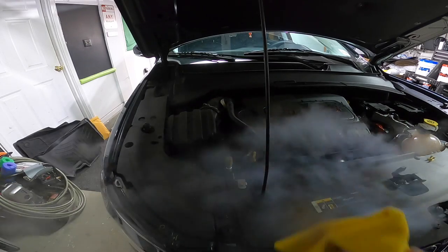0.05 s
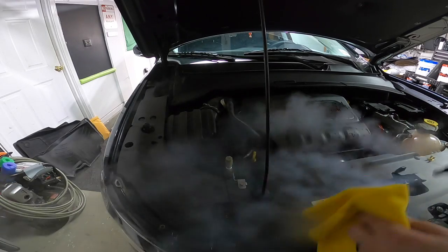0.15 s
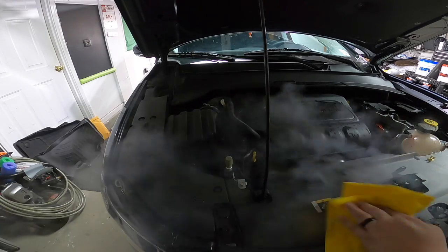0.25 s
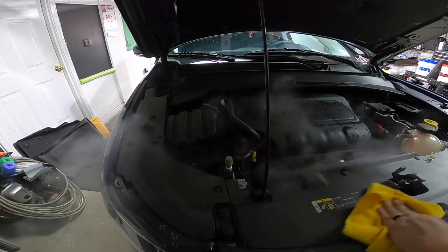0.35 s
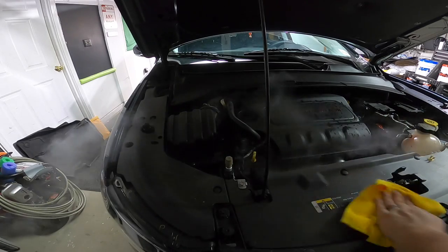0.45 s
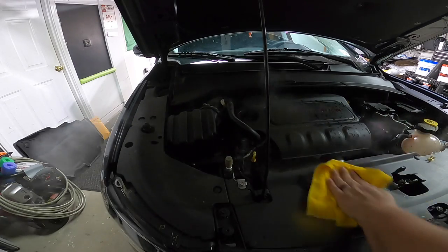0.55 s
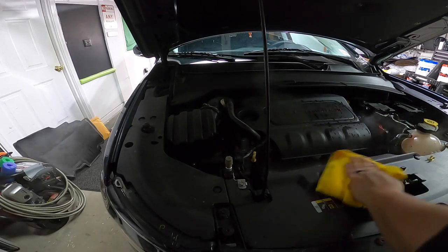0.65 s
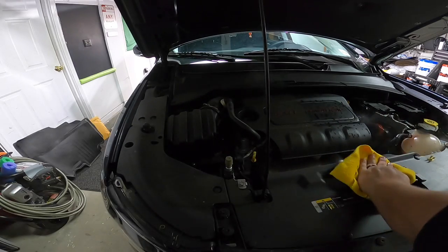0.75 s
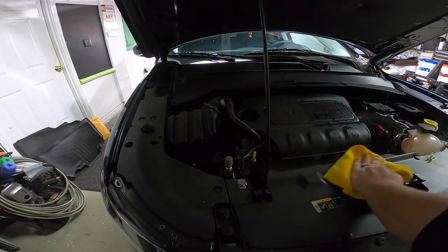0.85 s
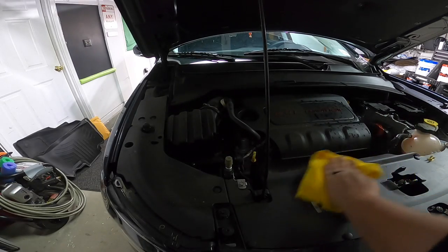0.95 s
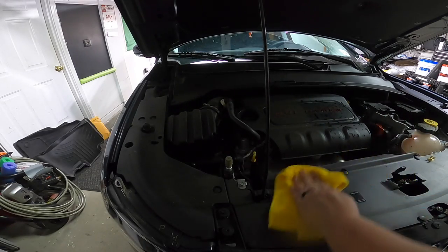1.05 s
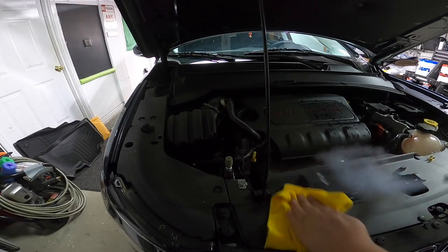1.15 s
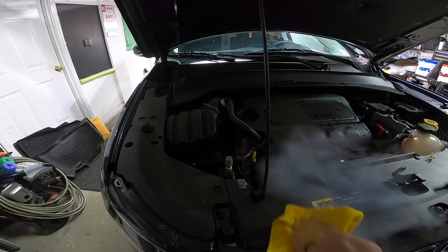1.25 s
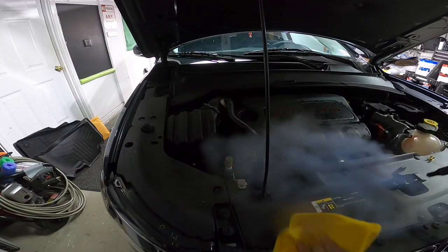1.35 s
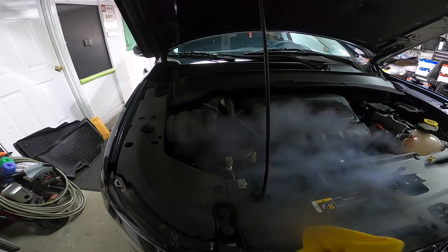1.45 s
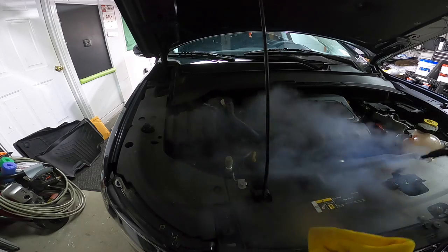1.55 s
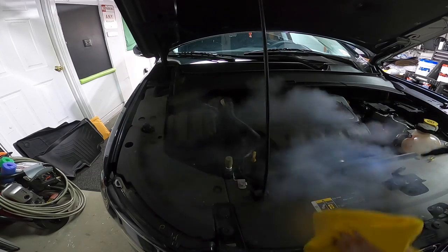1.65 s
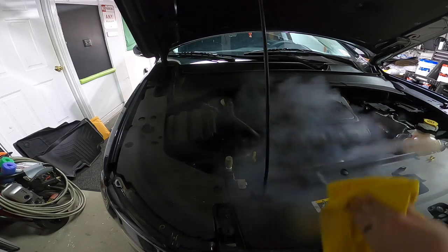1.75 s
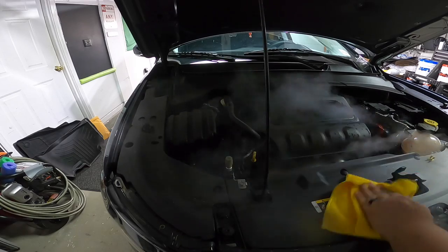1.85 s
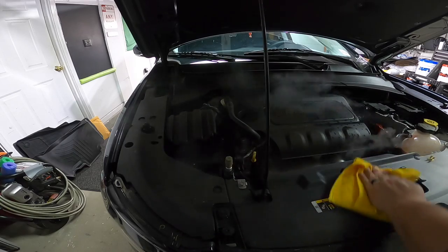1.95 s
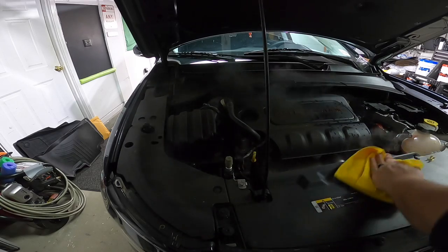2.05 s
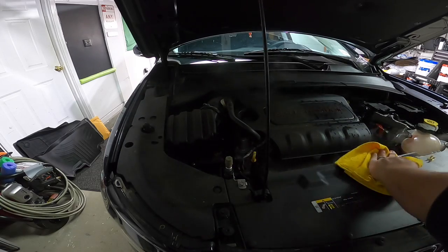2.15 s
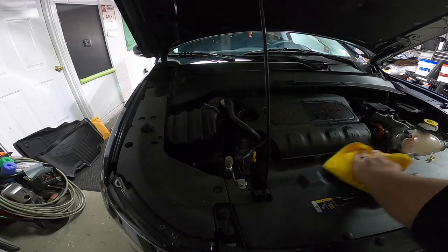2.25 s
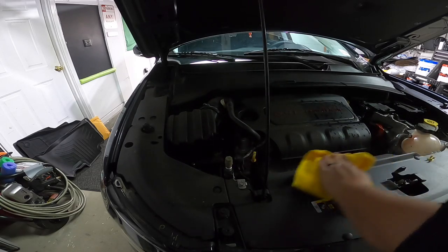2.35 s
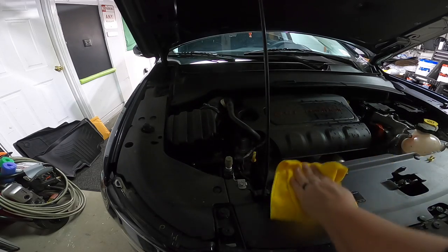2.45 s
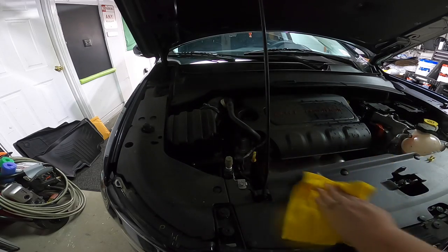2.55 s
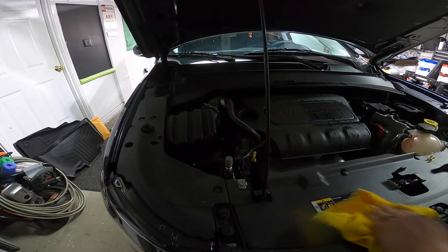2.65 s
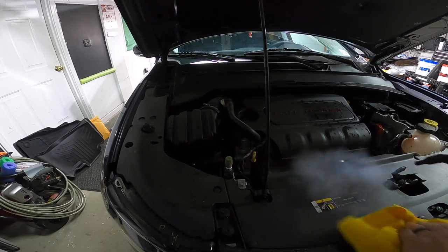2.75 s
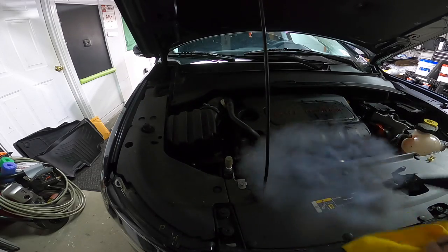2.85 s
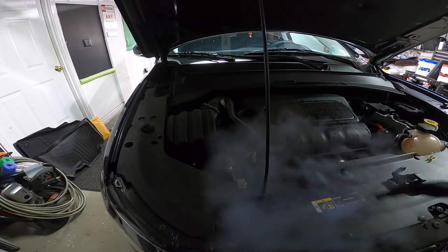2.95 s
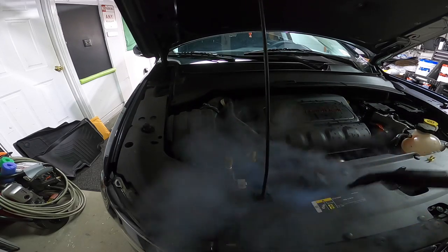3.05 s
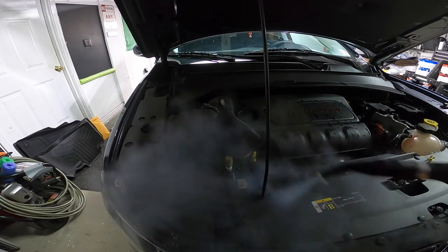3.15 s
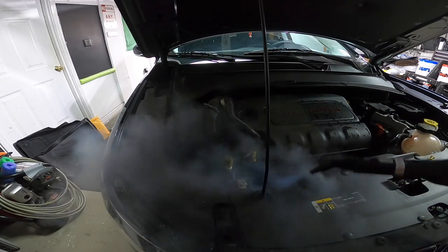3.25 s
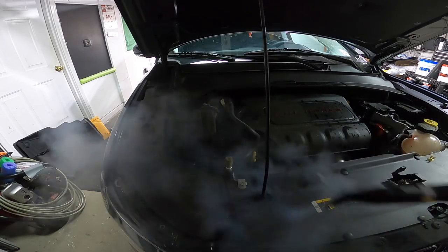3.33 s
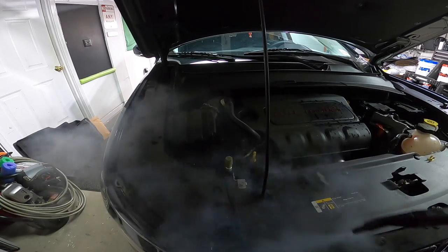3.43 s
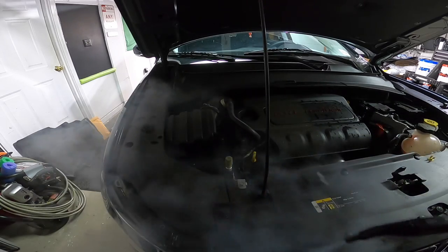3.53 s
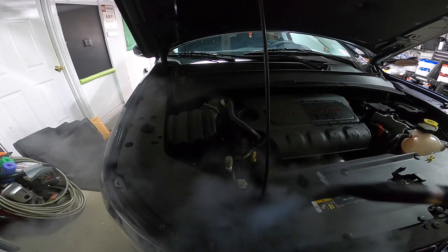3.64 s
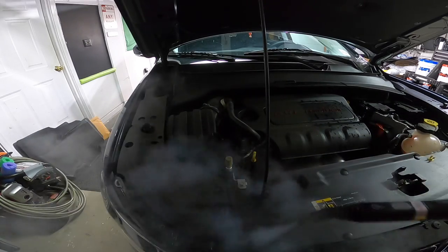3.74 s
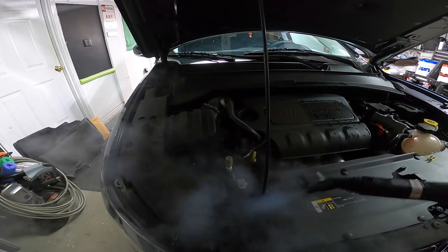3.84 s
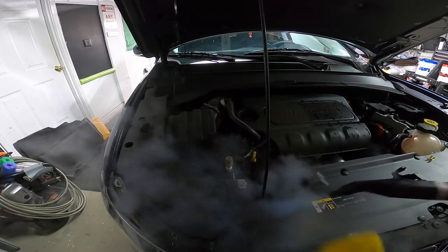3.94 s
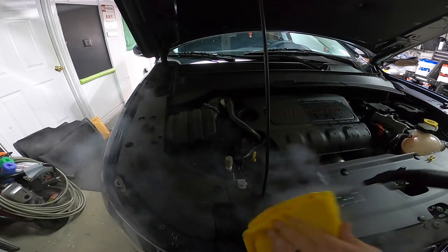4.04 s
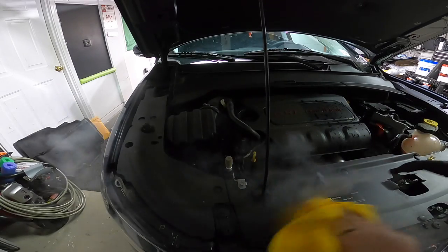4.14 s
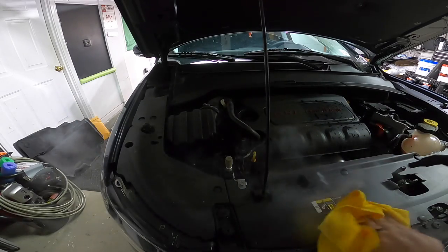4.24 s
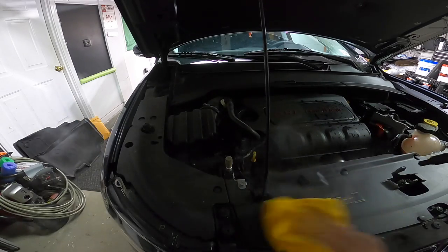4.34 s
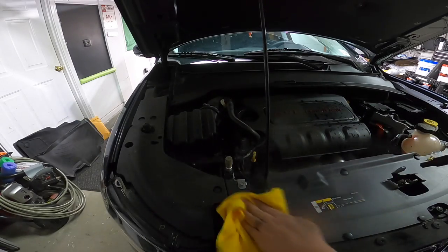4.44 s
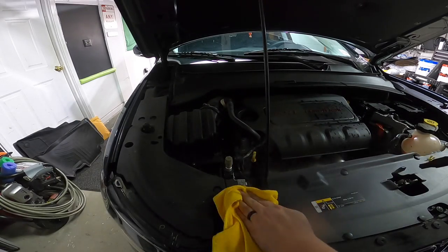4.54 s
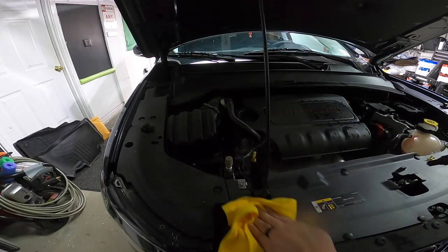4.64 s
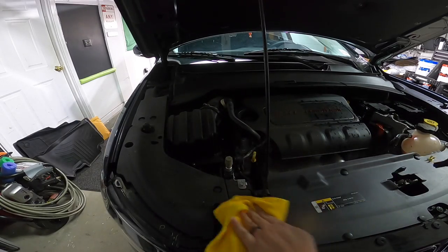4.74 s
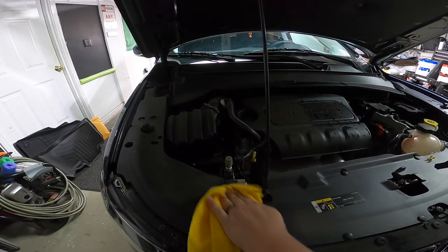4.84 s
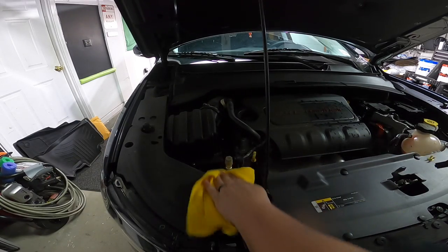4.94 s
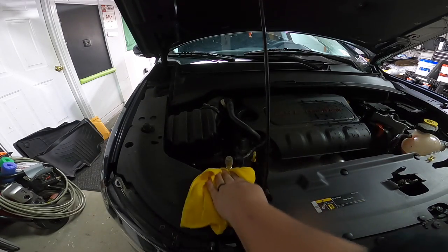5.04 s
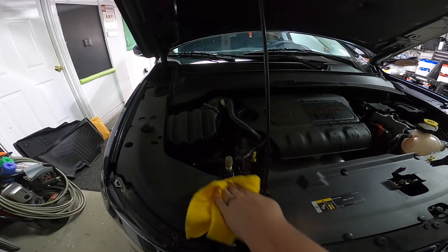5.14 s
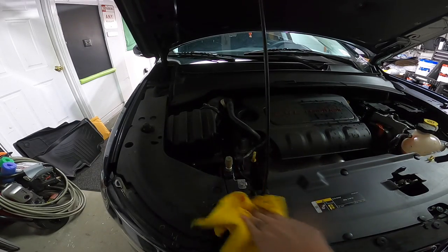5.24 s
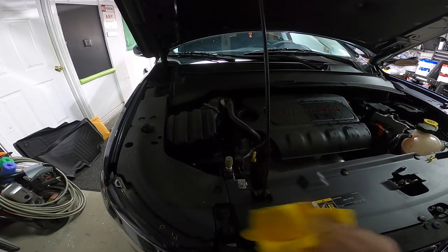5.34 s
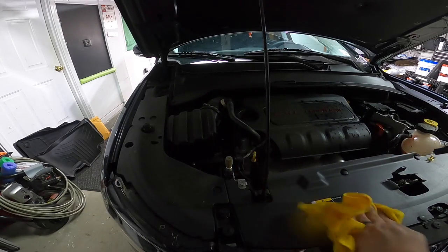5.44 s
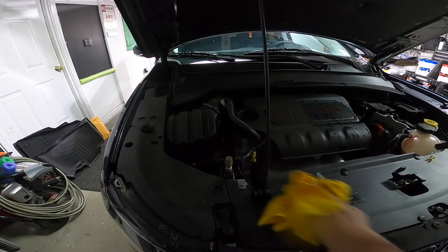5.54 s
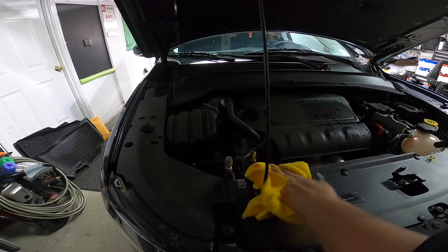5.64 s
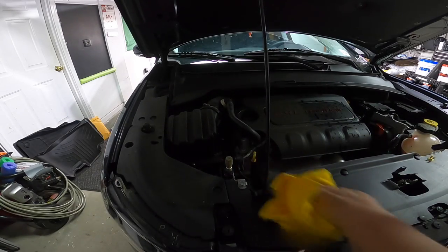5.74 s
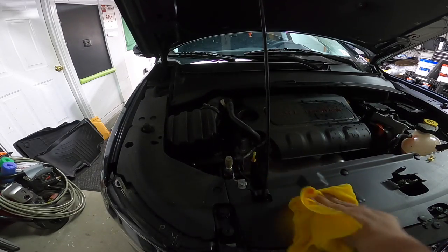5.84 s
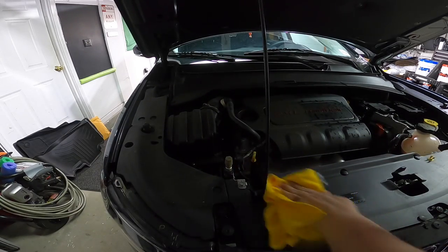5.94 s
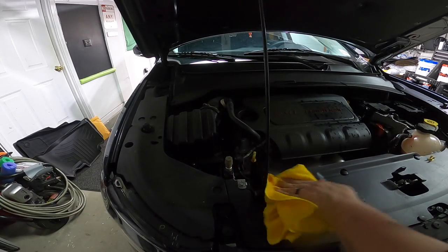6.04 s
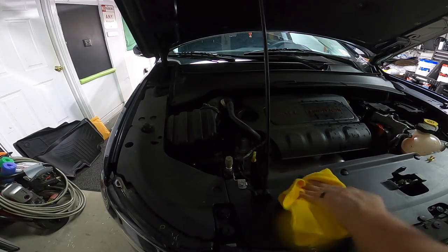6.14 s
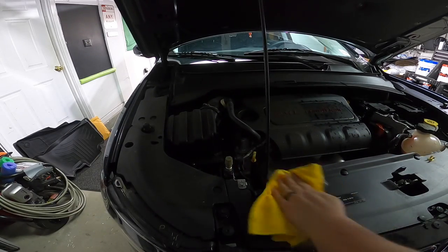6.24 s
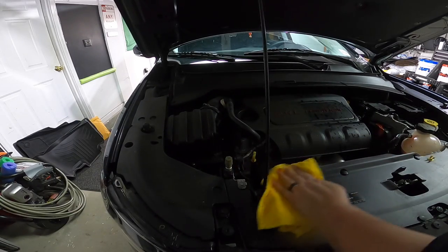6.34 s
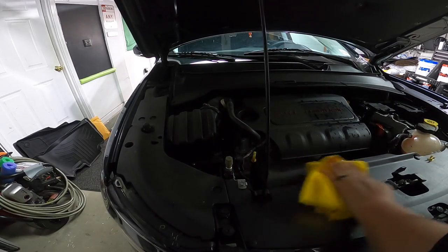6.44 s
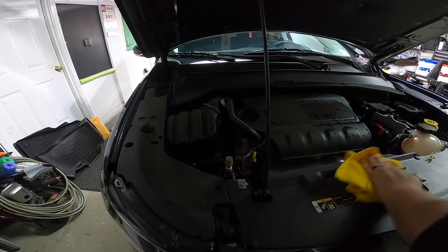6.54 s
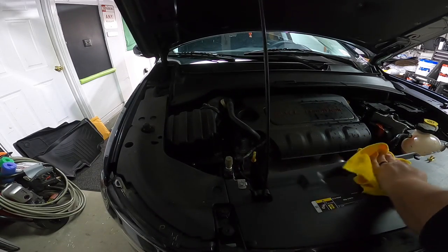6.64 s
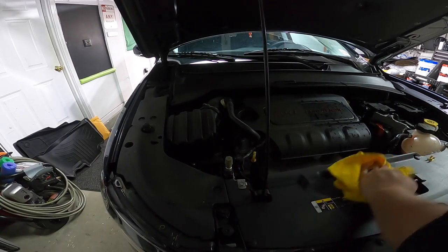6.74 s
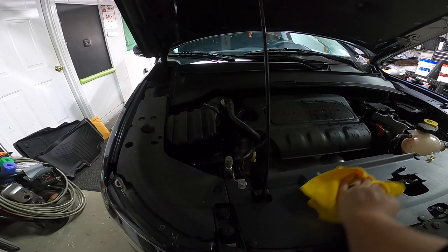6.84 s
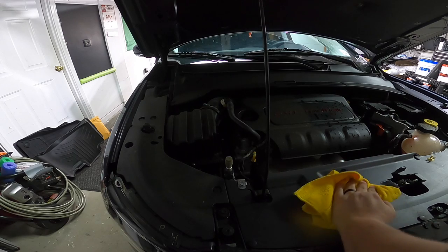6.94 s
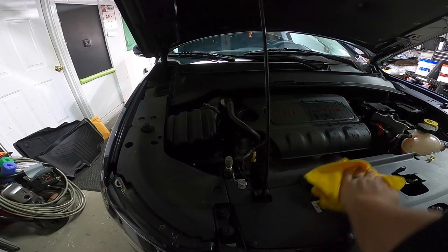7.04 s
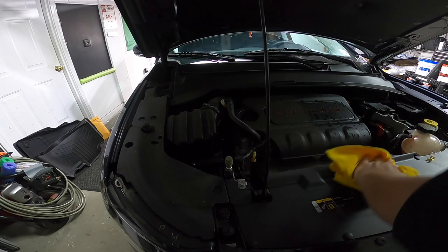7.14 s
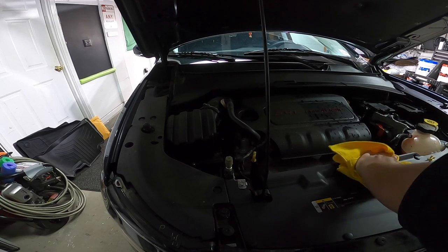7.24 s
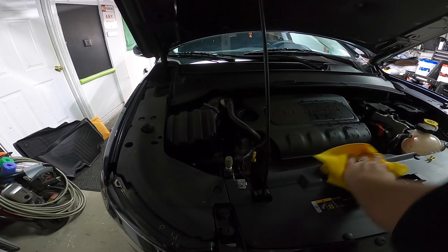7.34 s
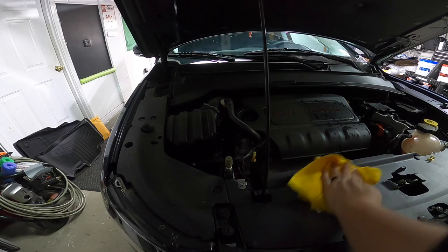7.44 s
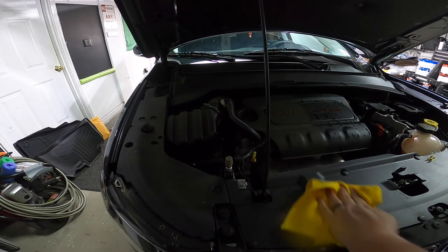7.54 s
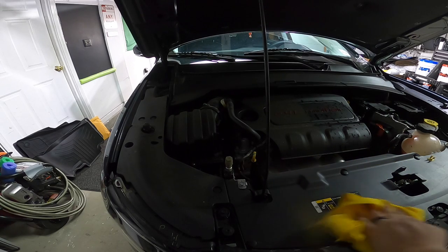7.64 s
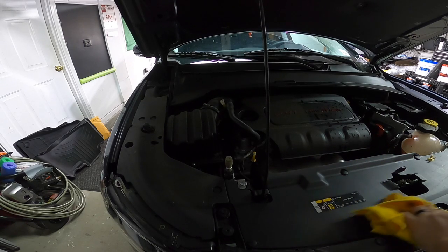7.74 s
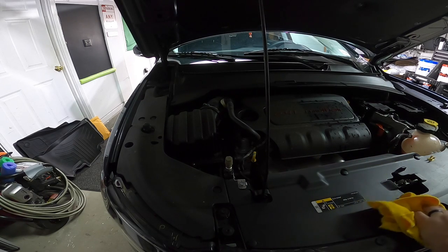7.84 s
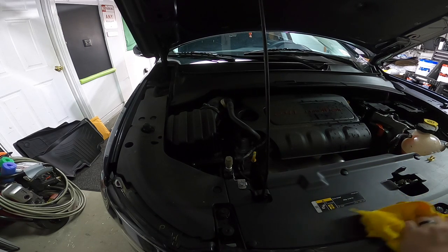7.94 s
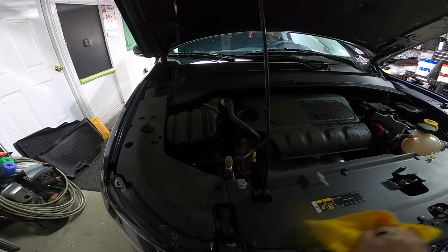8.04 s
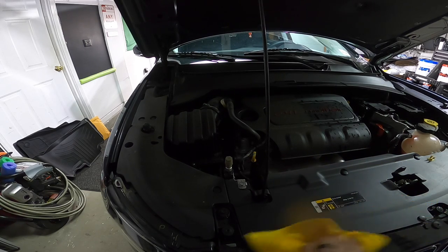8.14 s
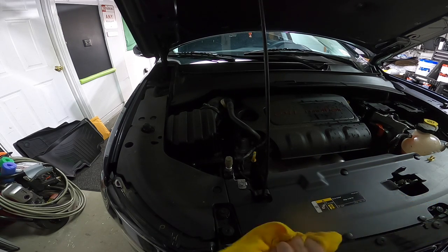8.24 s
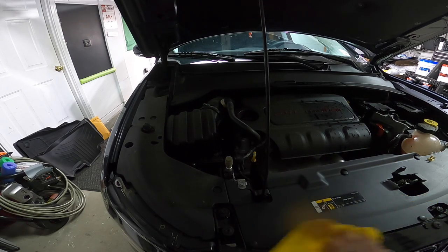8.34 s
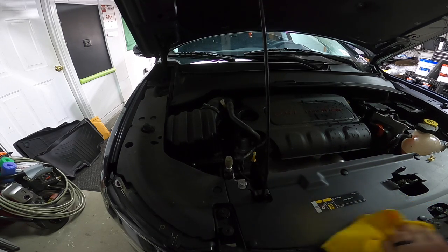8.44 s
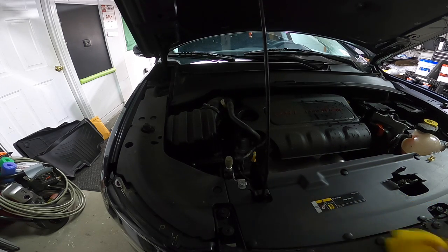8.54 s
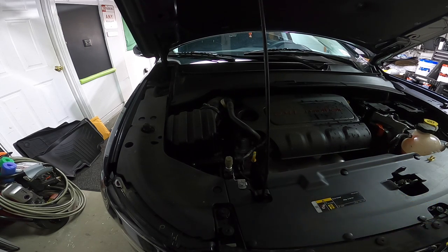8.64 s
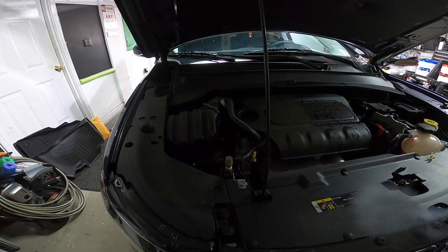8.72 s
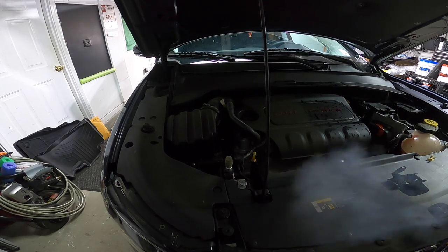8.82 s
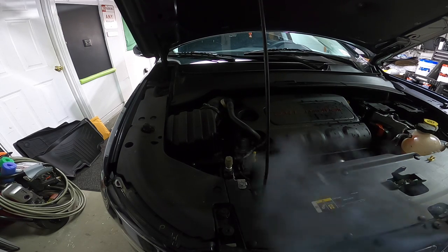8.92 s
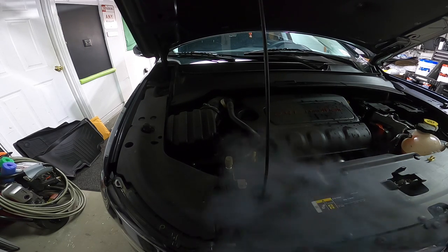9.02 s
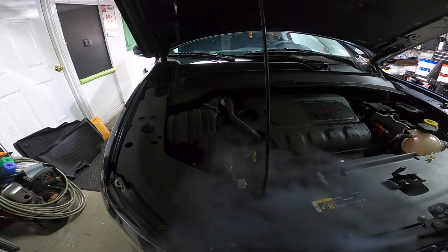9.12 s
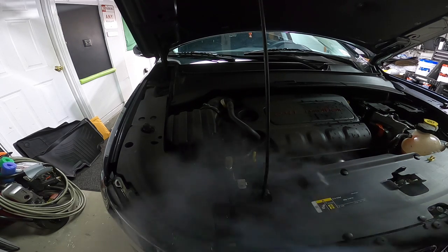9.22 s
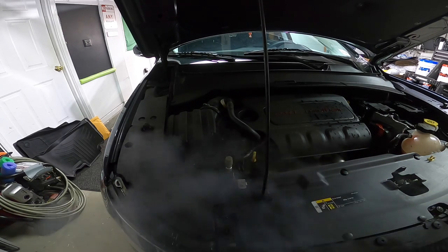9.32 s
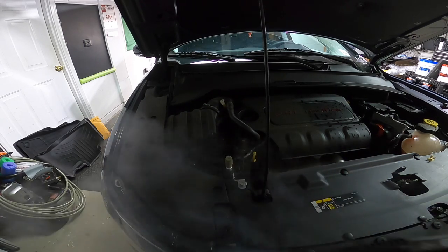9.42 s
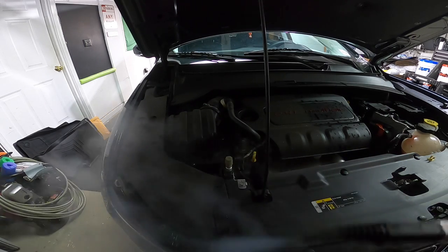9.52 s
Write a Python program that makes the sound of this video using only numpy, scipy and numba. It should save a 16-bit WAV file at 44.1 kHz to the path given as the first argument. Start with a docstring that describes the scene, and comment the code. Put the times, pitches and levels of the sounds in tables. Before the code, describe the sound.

Close, sharp bursts of hissing steam alternate with softer cloth wiping on plastic, a few clacks and one metallic knock.

```python
"""Steam cleaning an engine bay

A handheld cleaner blasts four times in a garage, close to a small two-port microphone: a turbulent
jet hisses, whistles and roars where it strikes. Between blasts a cloth rubs to and fro on the plastic
cover; bumps and clacks excite the modes of the plastic, and one knock those of a metal part.
Low rumble and, later, a distant engine hum come in from outside."""
import sys
import numpy as np
from scipy import signal
from scipy.fft import rfft, irfft, next_fast_len
from scipy.io import wavfile
from scipy.ndimage import uniform_filter1d, map_coordinates
from numba import njit

SR = 44100
rng = np.random.default_rng(int(sys.argv[2]) if len(sys.argv) > 2 else 0)


def bounce(signal):
    """Save signal as a 16-bit WAV file at the path given by the first command-line argument."""
    frames = np.transpose(np.atleast_2d(signal))
    limited = np.clip(frames, -1, 1)
    pcm = np.round(limited * 32767).astype(np.int16)
    wavfile.write(sys.argv[1], SR, pcm)


N = 422478

# gain of the side signals that widen the stereo image late in the scene: t/s, gain/dB
WIDENING = [(0, -70), (6.1, -70), (6.6, -12), (8.2, -6), (8.7, 0), (9.58, 0)]


def undb(db):
    """Amplitude ratio of a level in decibels."""
    return 10 ** (np.asarray(db) / 20)


def unit(x):
    """Normalisation to rms 1."""
    return x / np.sqrt(np.mean(x ** 2))


def curve(table):
    """Linear interpolation in time: each column after t/s, one value a sample."""
    times, *columns = np.transpose(table)
    return [np.interp(np.arange(N) / SR, times, column) for column in columns]


def colour(spectrum, hz):
    """Spectral level in dB at hz, interpolated over log frequency."""
    f, db = np.transpose(spectrum)
    return np.interp(np.log(hz), np.log(f), db)


def band_rms(spectrum, lo_hz, hi_hz):
    """Power summation: the rms between two frequencies of unit noise shaped by this spectrum."""
    f = np.fft.rfftfreq(4096, 1 / SR)[1:]
    return np.sqrt(np.mean(undb(colour(spectrum, f)) ** 2 * (f > lo_hz) * (f < hi_hz)))


def walk(rate):
    """Slow random modulation: levels held 1 / rate s and smoothed twice, with a spread near 1."""
    hold = int(SR / rate)
    steps = np.repeat(rng.standard_normal(N // hold + 1), hold)
    return 1.3 * uniform_filter1d(uniform_filter1d(steps, hold), hold)[:N]


@njit
def resonator(x, hz, width):
    """Second-order resonance: a state-variable band-pass with moving centre hz and width = 1 / Q."""
    y, band, low = np.empty(len(x)), 0., 0.
    for i in range(len(x)):
        g = np.tan(np.pi * hz[i] / SR)
        v = (band + g * (x[i] - low)) / (1 + g * (g + width))
        band, low, y[i] = 2 * v - band, low + 2 * g * v, width * v
    return y


def resonant_noise(hz, width):
    """Band-limited noise of rms 1: white noise through two equal resonators."""
    centre = np.full(N, hz)
    return unit(resonator(resonator(rng.standard_normal(N), centre, width), centre, width))


def band_noise(spectrum, extra_db, flicker_db, rate, excite=0.77):
    """Amplitude modulation of mid and side noise, independent in each third-octave band."""
    # incoherent side, constant part and part that follows WIDENING: f/Hz, side minus mid/dB
    steady_width = [(60, -13.5), (400, -21), (1000, -27.5), (1500, -98.5), (10700, -76.5), (11800, 2.5),
                    (16000, 0)]
    late_width = [(60, 1.5), (400, -14.5), (1300, -15), (2400, -20.5), (4400, -9), (8000, -7),
                  (16000, -10.5)]
    size = next_fast_len(N)
    f = np.maximum(np.fft.rfftfreq(size, 1 / SR), 1)
    noise = rfft(excite * rng.standard_normal((2, N)), size) * undb(colour(spectrum, f))
    parts = np.array([noise[0], *(noise[1] * undb(colour(w, f)) for w in (late_width, steady_width))])
    widening = undb(curve(WIDENING)[0])
    out = np.zeros((2, N))
    for step in range(-12, 13):
        hz = 1000 * 2 ** (step / 3)
        offset = np.clip(3 * np.log2(f / hz), -1, 1)
        mid, late_side, steady_side = irfft(parts * np.cos(np.pi / 2 * offset), size)[:, :N]
        gain = undb(extra_db(hz) + flicker_db * walk(rate))
        out += gain * np.array([mid, steady_side + widening * late_side])
    return out


def garage_air():
    """Ambient noise floor: faint, broadband and almost stationary."""
    spectrum = [(88, -27.5), (150, 2), (390, 4), (1380, 8), (3460, -6.5), (6970, -20.5), (9160, -33),
                (13800, -37.5), (15800, -47)]  # room noise: f/Hz, spectral density/dB
    air = band_noise(spectrum, lambda hz: 0, flicker_db=0.5, rate=13)
    return air * undb(-67) / band_rms(spectrum, 150, 16000)


def outside():
    """Low-frequency noise, and the harmonic hum of an engine whose fundamental sinks as it slows."""
    rumble_levels = [(0.0, -56), (0.9, -44.5), (2.29, -51.5), (2.91, -45), (3.71, -49.5), (3.92, -42.5),
                     (4.27, -55.5), (6.14, -45.5), (6.46, -56), (6.51, -41.5), (6.75, -51.5), (6.88, -47.5),
                     (8.24, -43.5), (9.15, -47), (9.58, -41)]  # course of the rumble: t/s, level/dB
    hum_levels = [(6.2, -73), (6.6, -48), (7.0, -52.5), (7.15, -42.5), (7.8, -38.5), (7.95, -52),
                  (8.1, -40), (8.5, -46.5), (8.75, -55), (9.3, -60)]  # course of the hum: t/s, level/dB
    harmonics = [(1, 0), (2, -34), (3, -26)]  # engine orders: multiple of the fundamental, level/dB
    t = np.arange(N) / SR
    rumble_db = curve(rumble_levels)[0] + 2 * walk(8)
    deep = resonant_noise(48., width=.98)
    upper = resonant_noise(110., width=.9)
    rumble = undb(rumble_db) * (deep + undb(-11) * upper)
    side = undb(rumble_db - 17) * deep[::-1]  # reversal makes it incoherent with the mid
    fundamental_hz = 83.3 - 9.5 * (t - 7.6)
    phase = 2 * np.pi * np.cumsum(fundamental_hz * (1 + 0.01544 * walk(20))) / SR
    tone = sum(undb(db + 2 * walk(12)) * np.sin(k * phase) for k, db in harmonics)
    onset_s = hum_levels[0][0]
    fade = np.interp(t, [onset_s - .3, onset_s], [0, 1])
    throb_db = 3 * walk(13)
    hum = np.sqrt(2) * fade * undb(curve(hum_levels)[0] + throb_db) * tone
    return np.array([rumble + hum, side])


def reverberation(x, t60_s=.14, level_db=-16):
    """Diffuse field of the garage: convolution with exponentially decaying noise."""
    t = np.arange(int(.6 * SR)) / SR
    tail = rng.standard_normal(len(t)) * undb(-60 * t / t60_s) * (t > .004)
    return undb(level_db) * signal.fftconvolve(x, tail / np.sqrt(np.sum(tail ** 2)))[:N]


def stroke_level():
    """Friction power in dB grows as the cube of speed; each stroke speeds up and slows into the turn."""
    strokes = [(0.376, 0.18, -48.5, -70), (0.498, 0.4, -57, -57), (0.898, 0.37, -54, -49.5),
               (1.904, .35, -59.5, -59.5), (2.28, .49, -55, -55.5), (2.69, 0.14, -50, -55),
               (4.166, .17, -56, -61), (4.339, 0.29, -55.5, -53), (4.62, 0.18, -63, -52.5),
               (4.763, 0.33, -60.5, -44.5), (5.122, 0.32, -59.5, -45), (5.346, 0.22, -47, -51.5),
               (5.519, 0.25, -50, -48), (5.736, .20, -55.5, -43), (5.919, .20, -48, -50.5),
               (6.11, 0.13, -45.5, -38.5), (6.228, 0.19, -52.5, -50.5), (6.363, 0.38, -47.5, -51.5),
               (6.733, .29, -54.5, -41.5), (7.011, 0.34, -47.5, -57.5), (7.368, 0.36, -44.5, -54.5),
               (7.639, .29, -53, -47.5), (7.916, 0.26, -58.5, -48), (8.11, 0.26, -47.5, -52),
               (8.34, 0.32, -53, -55.5)]  # sweeps of the hand: start/s, length/s, first level/dB, last level/dB
    speed_up_s, slow_down_s, resting_db = 0.095, 0.064, -72
    t = np.arange(N) / SR
    power = undb(2 * resting_db)
    for start, length, first_db, last_db in strokes:
        end = start + length
        speed = np.clip((t - start) / speed_up_s, 0, 1) * np.clip((end - t) / slow_down_s, 0, 1)
        power = power + speed ** 3 * undb(2 * np.interp(t, [start, end], [first_db, last_db]))
    return 10 * np.log10(uniform_filter1d(power, SR // 100))


def cloth():
    """Friction noise: fibres slip over textured plastic in dense grains."""
    spectrum = [(88, -35), (150, -10), (244, 2), (543, -3), (699, 1), (919, -4), (1530, -3), (3330, -8.5),
                (6840, -20.5), (8810, -20), (15800, -41.5)]  # rubbing noise: f/Hz, spectral density/dB
    rub_db = stroke_level()
    grains = unit(undb(1.5 * rng.exponential(size=N)))
    # fine fibres and lows swell less than the rub itself
    fine_db = -.25 * (rub_db + 59.5)
    drone_db = 2 * walk(6.5) - 0.52 * (rub_db + 66.5)

    def shelves_db(hz):
        return fine_db * np.clip(np.log2(hz / 3500), 0, 1) + drone_db * np.clip(np.log2(1200 / hz), 0, 1)

    rub = band_noise(spectrum, shelves_db, flicker_db=1.0, rate=14, excite=grains)
    for hz in (1500, 3000):  # two rasps wander with the hand
        rub[0] += .55 * resonator(rub[0], hz * 2 ** (.35 * walk(10)), width=.13)
    return rub * undb(rub_db + 1.5 * walk(45)) / band_rms(spectrum, 1200, 5000)


def ring(force, modes):
    """Modal superposition: a force drives damped modes, neighbours in opposite phase."""
    out = 0
    for k, (hz, db, t60) in enumerate(modes):
        pole = np.exp(2j * np.pi * hz / SR - np.log(1000) / (t60 * SR))
        out = out + (-1) ** k * undb(db) * signal.lfilter([1], [1, -pole], force).imag
    return out


def impact(modes, rattle_ms, dull_hz, ring_db, crack_db, crack_hz, thud_db):
    """Impact excitation: clear modes ring; the many weak ones blur into a thud and a brighter crack."""
    t = np.arange(SR) / SR
    contact = int(SR / dull_hz)  # a softer contact pushes longer and sounds duller
    body = ring(np.pad(np.hanning(contact), (0, SR - contact)), modes)
    thud, crack = (
        unit(signal.sosfilt(signal.butter(3, band, "band", fs=SR, output="sos"), rng.standard_normal(SR)))
        for band in ([250, 1500], [1500, crack_hz]))
    envelope = np.exp(-1000 * t / rattle_ms) * np.clip(t * dull_hz / 4, 0, 1)
    rattle = (undb(thud_db) * thud + undb(crack_db) * crack) * envelope
    return undb(ring_db) * body / np.abs(body).max() + rattle


def knocks():
    """Free vibration after a blow: the plastic cover, a little detuned each time, and once metal."""
    # modes of the cover and of the metal part: f/Hz, level/dB, T60/s
    cover_modes = [(129.9, -1, 0.15), (194, -0.5, 0.16), (325, 1.5, 0.078), (451, -3, 0.089),
                   (843, -3, 0.024), (1266, -8, 0.048)]
    metal_modes = [(202.4, -13.5, .9), (208, -8.5, 0.73), (356, -11, 0.47), (409, -1.5, 0.18),
                   (493, -6, .12), (585, -4.5, 0.15), (810, -2.5, 0.082), (1034, -1, 0.078),
                   (1154, 3, 0.07), (1780, -12, .05)]
    # hard clacks of trigger and nozzle: t/s, level/dB, relative ring/dB, relative crack/dB
    clacks = [(0.382, -23, -7, -24), (1.103, -31.5, 0.5, -18.5), (1.928, -31, -3, -23), (2.506, -40, 0, -8),
              (4.175, -23.5, -1.5, -12.5), (8.577, -28, -16.5, -5)]
    # soft bumps of the hand in its cloth: t/s, level/dB, inverse contact time/Hz, relative ring/dB
    bumps = [(5.028, -25, 1100, -13), (5.461, -39.5, 598, -3), (5.889, -36, 604, -4), (6.0, -39, 600, -3),
             (6.216, -37, 400, -1), (6.599, -40, 600, -3), (7.094, -33, 900, -14), (7.879, -33, 600, -8),
             (8.107, -22, 1410, -12), (8.199, -26.5, 500, -9), (8.243, -26, 300, 0.5)]
    out = np.zeros(N + SR)

    def strike(s, db, modes, **contact):
        out[int(s * SR):int(s * SR) + SR] += undb(db) * impact(modes, **contact)

    def detuned():
        return [(hz * (1 + 0.091 * rng.standard_normal()), db, t60) for hz, db, t60 in cover_modes]

    for s, db, ring_db, crack_db in clacks:
        strike(s, db, detuned(), rattle_ms=9.1, dull_hz=1430,
               ring_db=ring_db, crack_db=crack_db, crack_hz=4220, thud_db=-6)
    for s, db, dull_hz, ring_db in bumps:
        strike(s, db, detuned(), rattle_ms=20, dull_hz=dull_hz,
               ring_db=ring_db, crack_db=-33, crack_hz=4220, thud_db=-10)
    strike(s=4.605, db=-16.5, modes=metal_modes, rattle_ms=21.3, dull_hz=1230,
           ring_db=0, crack_db=-44, crack_hz=2530, thud_db=-10)
    return out[:N]


def valve(blasts, spit_db=4.5, spit_s=.08, fall_db_per_s=306):
    """Pressure release: each blast opens with a spit and decays exponentially once the valve shuts."""
    t = np.arange(N) / SR
    envelope = 0
    for opens, closes, rise, db, *_ in blasts:
        attack = np.clip((t - opens) / rise, 0, 1) ** 2
        overshoot_db = spit_db * np.exp(-np.abs(t - opens) / spit_s)
        bleed_db = fall_db_per_s * np.clip(t - closes, 0, 1)
        envelope = envelope + attack * undb(db + overshoot_db - bleed_db)
    return envelope


def whistle(level_db):
    """Narrow-band noise, heard as a whistle whose pitch wanders as the nozzle tilts."""
    pitches = [
        [(0.0, 9000), (0.11, 8630), (0.27, 9350)],
        [(1.21, 8940), (1.25, 8650), (1.366, 9680), (1.458, 8700), (1.546, 9680), (1.586, 8890), (1.724, 8650),
         (1.75, 9130), (1.82, 9490)],
        [(2.8, 8640), (2.852, 9180), (2.956, 8640), (3.104, 9400), (3.308, 9060), (3.898, 9110), (3.94, 8660),
         (3.996, 9480), (4.06, 9060)],
        [(8.78, 8550), (8.834, 8850), (9.58, 8760)],
    ]  # centre of the band, one list a blast: t/s, f/Hz
    hz = curve(np.concatenate(pitches))[0] * (1 + .025 * walk(25))
    return resonant_noise(hz, width=.21) * undb(level_db + 2 * walk(30) + .8 * walk(8))


def steam_jet():
    """Turbulent jet noise: a broadband hiss, a whistle, and a low roar where the steam strikes."""
    # blasts: valve opens/s, closes/s, rise/s, hiss level/dB, whistle over hiss/dB, roar gain/dB
    blasts = [(-0.1, 0.259, .01, -28.5, -7.5, -2.5), (1.2, 1.797, 0.017, -28, -1, -3),
              (2.783, 4.046, 0.03, -27, 0.5, -2.5), (8.761, 9.7, 0.034, -28.5, -0.5, 0)]
    spectrum = [(53, -39.5), (90, -10), (161, -13.5), (200, -8), (476, -13), (687, -10.5), (1700, -10),
                (3400, -5.5), (6660, -6.5), (8820, -2), (11400, -10.5), (13000, -10.5), (15800, -24)]  # jet noise: f/Hz, spectral density/dB
    # swells as the jet sweeps across an edge: t/s, hiss gain/dB, further roar gain/dB
    surges = [(1.69, 1.5, 2), (3.254, 2.5, -2), (3.56, 0, 5), (3.82, 1.5, 4), (9.08, 2, -2),
              (9.27, 2.5, 0.5), (9.43, 2, -2.5)]
    surge_s = .03
    t = np.arange(N) / SR
    surge_db, swell_db = sum(np.outer(db, np.exp(-.5 * ((t - s) / surge_s) ** 2)) for s, *db in surges)
    rows = np.array(blasts)
    current_blast = np.searchsorted(rows[1:, 0], t)
    whistle_db, roar_db = rows[current_blast, 4:].T
    roar_db = roar_db + swell_db + 0.93 * walk(6.9)

    def shelves_db(hz):
        return roar_db * np.clip(np.log2(1400 / hz), 0, 1) + surge_db * (hz < 7000)

    spray = band_noise(spectrum, shelves_db, flicker_db=1.8, rate=24) / band_rms(spectrum, 2000, 7000)
    # echoes off the parts near the moving nozzle comb-filter the hiss
    for lag_ms, share in [(.3, .1), (1.3, .2)]:
        lag = lag_ms * SR / 1000 * 2 ** (.35 * walk(9))
        spray[0] += share * map_coordinates(spray[0], [np.arange(N) - lag], order=3, mode="nearest")
    # gaps between the parts resonate as the nozzle sweeps over them
    for hz in (2900, 4500):
        spray[0] += .25 * resonator(spray[0], hz * 2 ** (.15 * walk(14)), width=.15)
    spray[0] += whistle(whistle_db)
    sputter = undb(walk(60))  # droplets pass the nozzle
    return spray * valve(blasts) * sputter


def scene():
    """Superposition of the sources as mid and side; their sum and difference are left and right."""
    # side that lags by a quarter cycle, as from a source off to the right: f/Hz, side minus mid/dB
    lagging_width = [(100, -28.5), (1200, -10), (2400, -11), (4400, 0), (8000, -0.5), (11000, 0.5),
                     (16000, -11.5)]
    mid, side = garage_air() + steam_jet() + cloth()
    mid = mid + knocks()
    mid = mid + reverberation(mid)
    mid, side = np.array([mid, side]) + outside()
    f = np.maximum(np.fft.rfftfreq(N, 1 / SR), 1)
    quadrature = irfft(-1j * undb(colour(lagging_width, f)) * rfft(mid), N)
    side = side + undb(curve(WIDENING)[0]) * quadrature
    return np.array([mid + side, mid - side])


def record(dry):
    """Soft saturation and a steep low-pass in the recorder; the right port takes more of the top octave."""
    treble_tilt, ceiling, cutoff_hz = .15, .45, 15900
    treble = signal.sosfiltfilt(signal.butter(14, 11500, "high", fs=SR, output="sos"), dry)
    tilted = dry + treble_tilt * treble * np.array([[-1], [1]])
    rounded = ceiling * np.tanh(tilted / ceiling)
    return signal.sosfilt(signal.ellip(14, .2, 80, cutoff_hz, fs=SR, output="sos"), rounded)


dry = scene()
out = record(dry)
bounce(out)
```